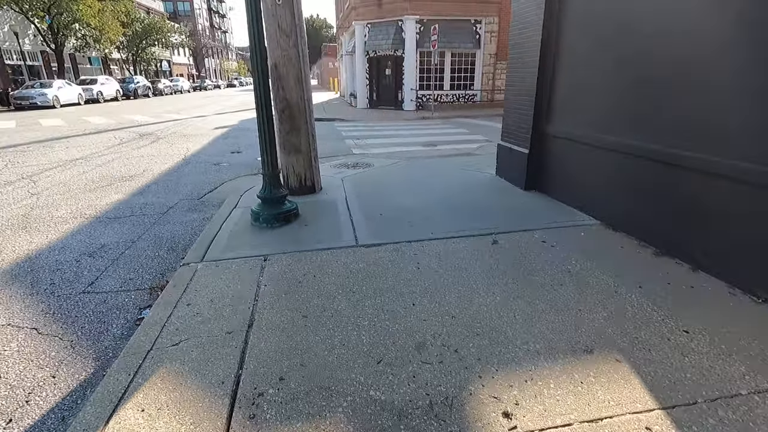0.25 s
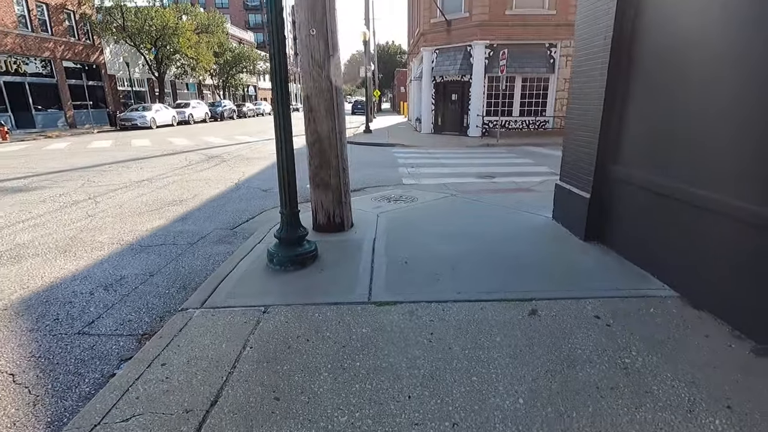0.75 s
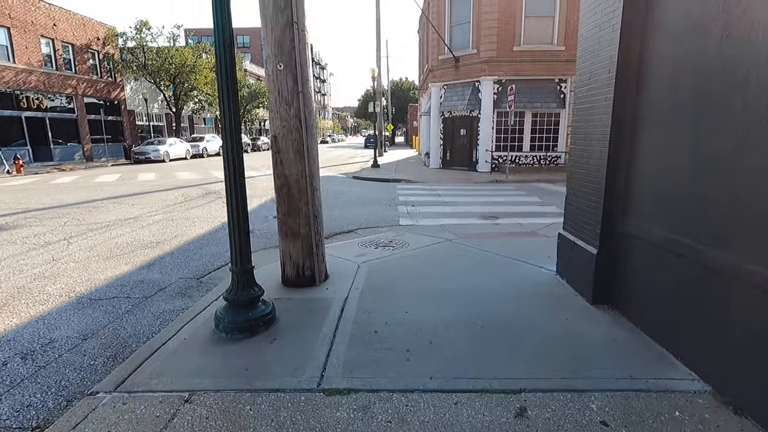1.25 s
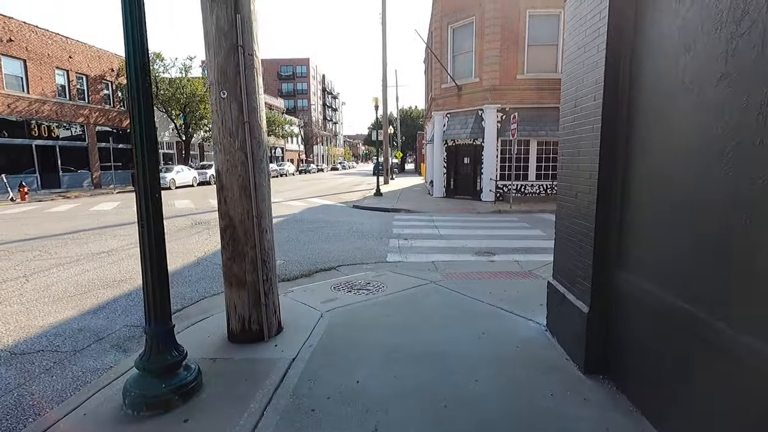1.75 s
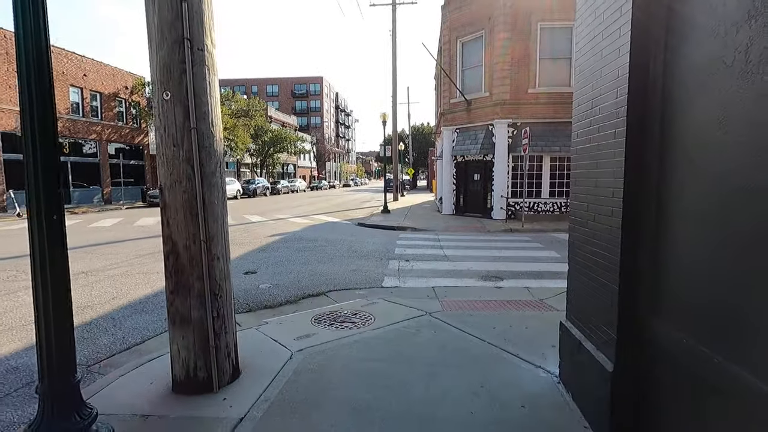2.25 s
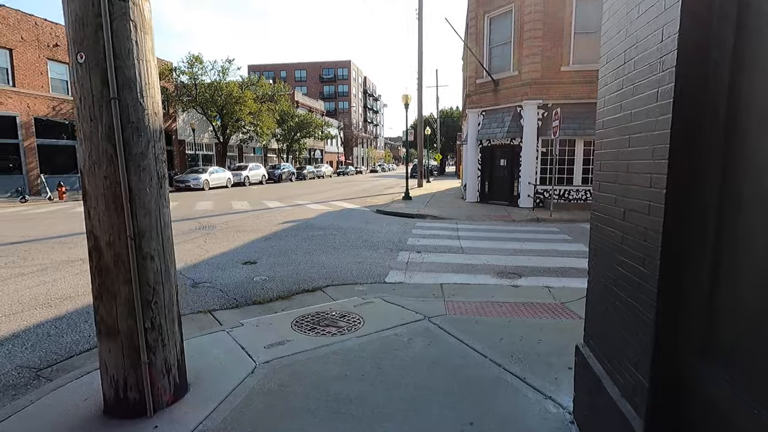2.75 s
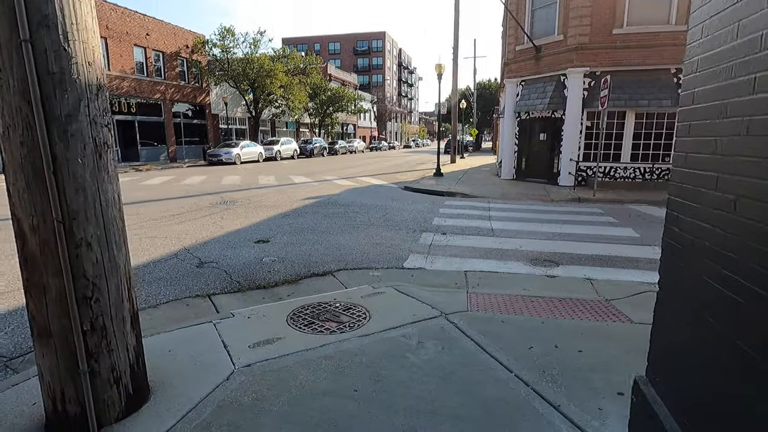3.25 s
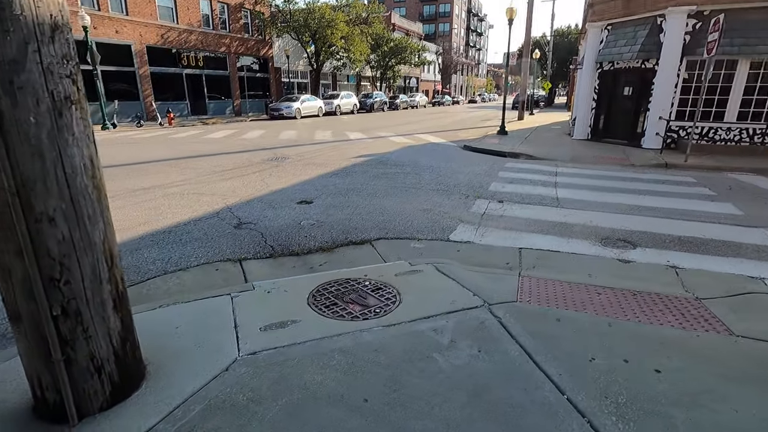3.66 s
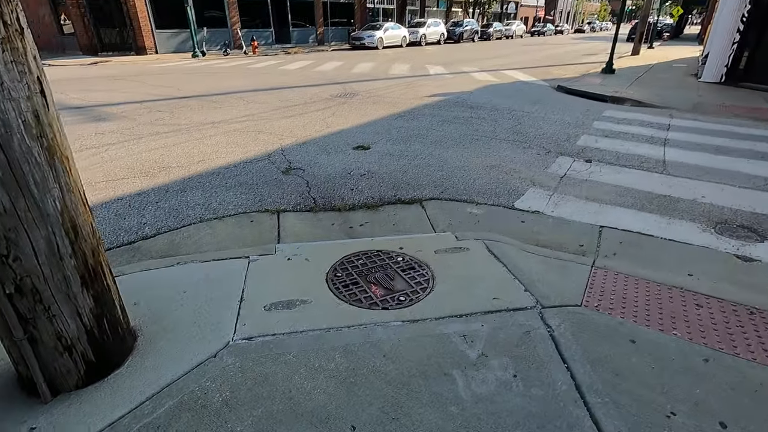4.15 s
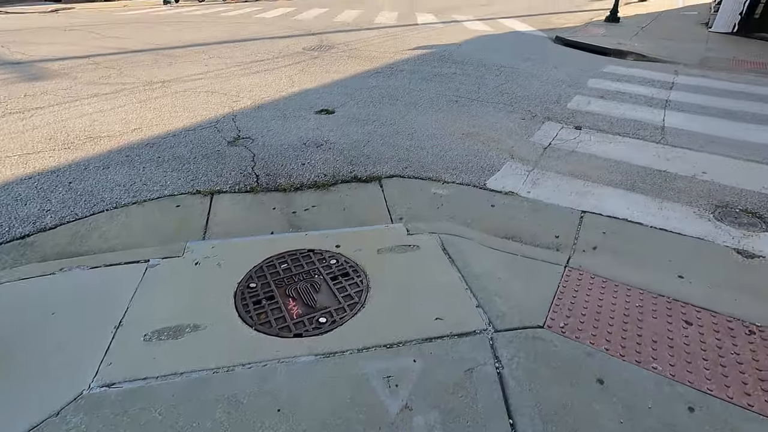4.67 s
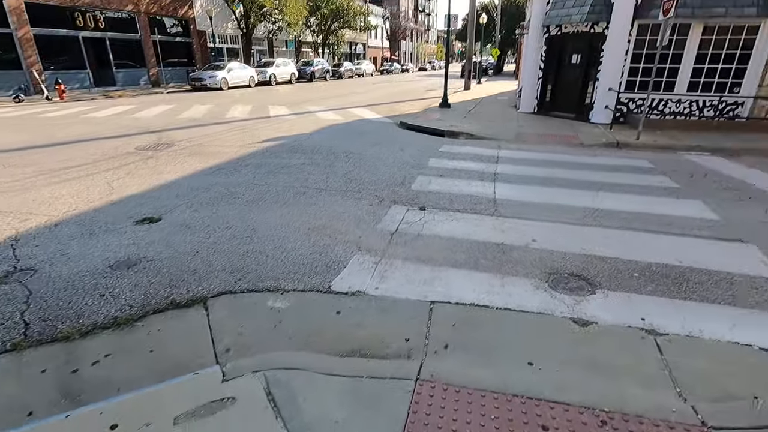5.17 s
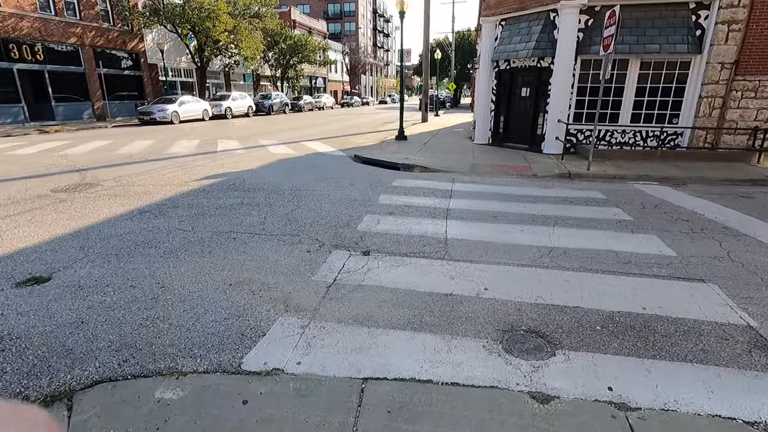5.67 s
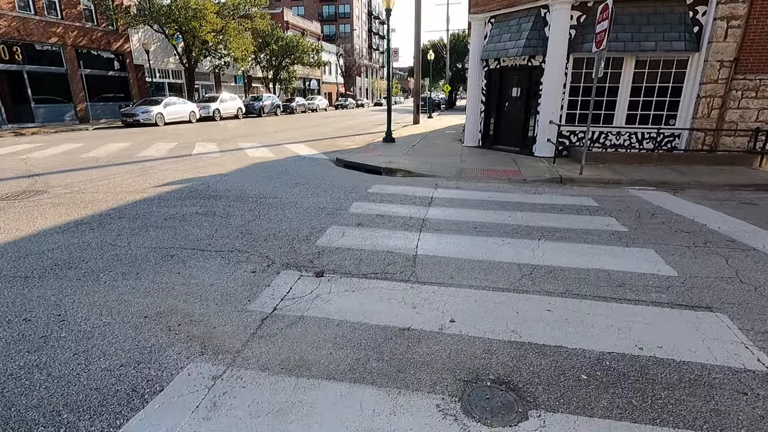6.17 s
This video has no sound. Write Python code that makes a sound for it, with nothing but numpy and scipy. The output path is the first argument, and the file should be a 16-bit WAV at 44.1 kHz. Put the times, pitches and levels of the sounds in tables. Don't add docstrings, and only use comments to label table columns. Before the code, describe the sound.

A low engine rumble slows and deepens on a small-town street while a walker's steps scuff and tick, with one sharp knock midway.

```python
import sys
import numpy as np
from scipy import signal
from scipy.fft import rfft, irfft, next_fast_len
from scipy.io import wavfile

SR = 44100
rng = np.random.default_rng(int(sys.argv[2]) if len(sys.argv) > 2 else 0)


def file_out(sig):
    cols = np.atleast_2d(sig).T
    lim = np.clip(cols, -1, 1)
    pcm = np.round(lim * 32767).astype(np.int16)
    wavfile.write(sys.argv[1], SR, pcm)


def how_loud(loudness_db):
    steps = np.asarray(loudness_db, float) / 20
    return 10 ** steps


N = 282681

# t/s, firing f/Hz, effort level/dB
ENGINE_COURSE = [(-0.0, 38.56, -27.6), (0.35, 36.64, -21.5), (1.34, 34.52, -20.6), (1.55, 33.8, -21.7),
                 (1.74, 33.41, -26.9), (2.31, 31.58, -28.8), (2.94, 30.25, -30.5), (3.29, 28.81, -21.9),
                 (3.54, 28.05, -26.0), (3.93, 31.46, -25.8), (4.21, 32.27, -31.9), (4.51, 29.68, -27.0),
                 (4.77, 26.23, -33.0), (5.04, 25.1, -28.5), (5.52, 22.75, -32.7), (5.69, 23.1, -31.4),
                 (6.07, 25.57, -28.3), (6.41, 24.41, -24.7)]
COASTING_DB = [-28, -33.5, 3.6, -24.8, -30.2, -41, -33, -35, -39, -42]
LOADED_DB = [-9, -.8, .7, -7, -17, -16, -17, -22, -23, -26]
# start t/s, end t/s
LOAD_ON_S = (1.37, 2.41)
# f/Hz, level/dB
PIPE_RESPONSE = [(20.0, -14.7), (32.0, 4.8), (56.0, 0.3), (75.0, -9.6), (100.0, 0.4), (125.0, 0.0),
                 (165.0, -0.8), (230.0, -3.7), (265.0, -2.0), (320.0, -12.0)]
# t/s, f/Hz, half length/s, level/dB
WALL_ECHOES = [(0.1, 262.0, 0.2, 18.0), (2.05, 98.0, 0.15, 2.0), (5.45, 70.0, 0.15, 4.0),
               (4.75, 190.0, 0.15, 5.0), (2.75, 195.0, 0.15, 8.0), (0.17, 189.0, 0.301, 22.8),
               (0.5, 245.0, 0.25, 12.0), (0.15, 80.0, 0.15, 12.0), (0.7, 180.0, 0.12, 10.6),
               (1.3, 310.0, 0.15, 8.0), (1.9, 262.0, 0.15, 8.0), (1.07, 69.0, 0.229, 18.2),
               (1.83, 131.0, 0.204, 5.7), (1.85, 165.0, 0.139, 15.7), (2.16, 62.0, 0.044, 11.0),
               (2.44, 159.0, 0.18, 14.2), (2.58, 93.0, 0.076, -16.8), (2.7, 124.0, 0.16, 9.5),
               (2.75, 242.0, 0.2, 6.0), (2.5, 60.0, 0.1, 5.0), (3.1, 200.0, 0.1, 5.0),
               (2.81, 29.0, 0.143, 9.0), (2.95, 92.0, 0.034, -13.5), (3.06, 91.0, 0.106, 5.5),
               (3.12, 125.0, 0.167, -19.1), (3.32, 58.0, 0.108, 1.0), (3.46, 85.0, 0.033, -11.3),
               (3.56, 174.0, 0.194, 7.7), (3.65, 118.0, 0.12, 7.4), (3.3, 265.0, 0.15, 3.0),
               (3.95, 190.0, 0.2, 6.0), (4.1, 265.0, 0.1, 5.0), (4.6, 195.0, 0.25, 5.0),
               (4.07, 97.0, 0.077, -9.3), (4.16, 159.0, 0.216, 10.2), (4.3, 99.0, 0.233, 9.3),
               (4.31, 63.0, 0.06, 6.0), (4.53, 90.0, 0.111, 2.8), (4.82, 104.0, 0.191, 16.7),
               (5.07, 176.0, 0.097, 8.4), (5.23, 105.0, 0.204, 10.9), (5.57, 111.0, 0.339, 22.7),
               (5.64, 168.0, 0.293, 21.3), (5.85, 240.0, 0.25, 6.0), (5.25, 30.0, 0.1, 5.0),
               (6.0, 176.0, 0.059, 13.1), (6.02, 110.0, 0.15, 14.3), (6.26, 136.0, 0.097, 20.1)]
# t/s, peak level/dB, ring f/Hz, t60/s, pan/dB
SOLE_KNOCKS = [
    (1.053, -30, 1280, 0.014, -1),
    (1.0855, -23, 1300, 0.007, 6),
    (1.098, -20.5, 1350, 0.0065, 4),
    (1.776, -32, 1140, 0.0037, -1),
    (3.409, -28.5, 525, 0.018, 1.0),
    (3.92, -33, 711, 0.011, -0.5),
    (4.513, -40, 554, 0.02, -3),
    (4.604, -27, 572.3, 0.01, -0.5),
    (4.951, -29, 585, 0.0041, -15),
    (5.851, -27.5, 1470, 0.01, 5),
]
# t/s, length/s, level/dB, lowest f/Hz, highest f/Hz
SOLE_SCUFFS = [(.385, .07, -45, 900, 4000), (1.032, .03, -47, 900, 5500), (1.066, 0.015, -44, 700, 4500),
               (1.084, 0.025, -42.5, 900, 5500), (2.65, .03, -38, 700, 2600),
               (2.651, .022, -44, 2000, 5500), (2.664, .012, -39, 600, 2000), (2.706, .01, -47, 2000, 4500),
               (2.716, .018, -40, 900, 2600), (3.33, 0.018, -37, 500, 1300),
               (3.331, 0.012, -41, 1200, 2000), (5.682, .031, -40.5, 900, 1800),
               (5.684, .022, -44, 1900, 2800), (5.812, .035, -47, 800, 2400),
               (1.088, .035, -49, 2800, 5600), (2.722, .014, -46, 1500, 5000),
               (4.514, 0.0065, -44, 1002, 2000)]
# t/s, peak level/dB, lowest
# f/Hz, highest f/Hz, pan/dB
TICKS = [(.392, -41.5, 1800, 7000, 2), (.416, -41.5, 2500, 7500, 3), (.439, -40, 2000, 5000, 2),
         (1.049, -37, 2400, 5500, 3), (1.0855, -33.5, 2500, 5700, 3), (1.709, -37.5, 3600, 5900, 6),
         (2.352, -36, 1700, 3600, 6), (2.652, -33.5, 1200, 6900, -1), (2.851, -37, 2000, 6488, 3),
         (3.4624, -22.5, 2900, 7200, -2), (4.0539, -32, 2210, 5850, 1.5), (4.4488, -37, 3500, 8000, 1),
         (4.453, -42, 4000, 10000, 1), (4.4565, -41, 3500, 8000, 1), (4.4703, -26.5, 2600, 8000, 2),
         (4.952, -31.5, 2500, 7000, -1), (5.223, -41, 2000, 4000, 1.5), (5.242, -37, 2500, 4500, .5),
         (5.392, -41, 2400, 4800, 1.5),
         (1.0325, -44, 6500, 8900, 7), (1.0855, -35.5, 6448, 9860, 4.5), (1.098, -42, 6500, 9000, 5),
               (1.059, -46, 6500, 9500, 5), (1.155, -48, 6500, 8500, 5), (1.2765, -40, 6500, 13500, 6),
               (1.2788, -30, 5300, 8000, 8.5), (1.2792, -43, 9500, 13990, 4), (2.409, -49, 6000, 8450, 2),
               (2.858, -58, 9000, 11600, 2), (3.4626, -37.5, 10500, 15500, -2.5),
               (4.449, -48, 9000, 15000, 1), (4.4703, -43, 8500, 15000, 2), (4.534, -39, 3500, 9500, 1.5),
               (4.684, -48, 9000, 12800, 0), (4.786, -42.5, 6770, 13500, 7), (4.812, -56, 11000, 13000, 5),
               (4.952, -39.5, 6500, 10300, 0), (5.237, -45.5, 7530, 12600, 5),
               (5.784, -37.5, 5970, 14540, 3.5)]
# t/s, body level/dB, body f/Hz, t60/s, crack level/dB, crack f/Hz
HOLDER_KNOCK = [
    (3.4625, -8.5, 225, 0.015, -11.5, 1150),
]
# t/s, peak level/dB, rise/s per 10 dB, fall/s per 10 dB
CLOTH_SLIPS = [(.43, -68, .1, .08), (1.09, -70, .12, .07), (1.71, -72, .03, .07), (2.655, -67.5, .025, .05),
               (2.73, -71, .06, .055), (3.34, -75, .05, .25), (4.07, -73, .08, .07), (4.27, -69, .06, .4),
               (4.46, -62.5, .14, .035), (4.56, -63, .03, .08), (4.69, -66.5, .09, .055),
               (5.15, -68.5, .14, .04), (5.25, -68, .05, .035), (5.7, -68.5, .12, .1),
               (5.89, -69.5, .15, .1), (6.12, -68, .035, .055), (6.28, -61.5, .09, .08)]
# f/Hz, level/dB per Hz
CLOTH_SPECTRUM = [(1500, -32.5), (3000, -3), (5000, 4.5), (8000, -2.5), (11000, -12), (13000, -16),
                  (15500, -27)]
# t/s, level/dB
TRAFFIC = [(0, -55), (.36, -55), (.8, -58.5), (1.09, -57), (1.41, -60), (1.95, -60), (2.62, -56.5),
           (3.07, -56.5), (3.5, -59), (3.86, -58.5), (4.43, -60), (5.59, -60), (5.89, -59), (6.41, -57.5)]
# f/Hz, level/dB per Hz
RUMBLE_SPECTRUM = [(14, -3.5), (25, -11.5), (45, -1.5), (80, -4), (130, -5.5), (200, -10.5), (260, -9.5),
                   (330, -18), (450, -24.5), (800, -55)]
# f/Hz, level/dB per Hz
ROAR_SPECTRUM = [(210, -31.5), (350, -2), (420, -3.5), (550, -5), (720, -7), (830, -11.5), (1100, -9.5),
                 (1600, -12), (2100, -17.5), (2450, -21), (2900, -27), (4200, -59.5)]
# f/Hz, level/dB per Hz
TREAD_SPECTRUM = [(600, -44.5), (830, -10.5), (940, 2), (1030, 1.5), (1200, -2.5), (1500, -15.5),
                  (2200, -48)]
# f/Hz, level/dB per Hz
HISS_SPECTRUM = [(1410, -29), (2400, -3), (2620, -2), (3850, -1), (5790, -7), (10400, -31.5),
                 (12100, -29.5), (12500, -30), (12900, -48)]
# t/s, level/dB
FAN_WHINE = [
    (0, -58),
    (2.1, -78.5),
    (2.5, -60),
    (4.3, -64.5),
    (4.8, -78),
    (6.41, -88),
]
# t/s, level/dB
VENT_HISS = [
    (0, -71.5),
    (3.6, -69.5),
    (4.3, -62.5),
    (5.0, -64),
    (5.4, -57),
    (6.41, -59),
]
# f/Hz, level/dB per Hz
VENT_SPECTRUM = [(2500, -39.5), (3100, -10.5), (3700, -1.5), (4800, -0.5), (5400, -2.5), (6100, 0),
                 (6700, -11), (8000, -38.5)]
# t/s, peak level/dB, rise/s per 10 dB, fall/s per 10 dB
TRILL_BOUTS = [
    (1.16, -81, 1.5, 1.5),
    (2.4, -82, .8, .6),
    (3.3, -78, .9, .2),
    (3.9, -86, .3, .8),
    (4.69, -80, .03, .03),
    (5.65, -85, .2, .6),
]
# f/Hz, level/dB per Hz
BREEZE_SPECTRUM = [(10, -14.5), (20, -0.5), (35, -3), (60, -6), (110, -30)]
# f/Hz, side minus mid level/dB
WIDTH = [(25, -20.5), (60, -24), (125, -23), (250, -17.5), (500, -7.3), (1000, -7), (2000, -5.5),
         (4000, -5.5), (8000, -4), (13000, -2.5)]
# f/Hz, left minus right level/dB
LEAN = [(25, -0.5), (125, .4), (250, 1.2), (500, .8), (1000, 2.5), (2000, 3), (4000, 0.4), (8000, 3.5),
        (13000, 8.5)]
# f/Hz, angle/rad (0 = unrelated noise, pi / 2 = a lag only)
PORT_TURN = [(200, .1), (700, .55), (2500, .5), (5000, .3), (6500, -.35), (13000, -.5)]


def engine():
    firing_hz, effort_db = in_time(ENGINE_COURSE)
    load = np.interp(seconds(), LOAD_ON_S, [0, 1])
    levels_db = []
    for k, (shut_db, open_db) in enumerate(zip(COASTING_DB, LOADED_DB), 1):
        throttle_db = shut_db + load * (open_db - shut_db)
        levels_db.append(effort_db + throttle_db + colour_db(k * firing_hz, load))
    ragged = 0.35 + 0.65 * load
    boom = orders(firing_hz, levels_db[:4], first=1, rough_db=1.8 * ragged, wander=0.25 * ragged)
    growl = orders(firing_hz, levels_db[4:], first=5, rough_db=2.5, wander=0.3)
    return (boom + growl) * sides(0.3)


def orders(firing_hz, levels_db, first, rough_db, wander):
    turn = 2 * np.pi * np.cumsum(firing_hz) / SR
    out = 0
    for k, level_db in enumerate(levels_db, first):
        phase = k * turn + rng.uniform(0, 2 * np.pi) + wander * drift(16)
        uneven = how_loud(-29.5) * (drift(3) * np.sin(phase) + drift(3) * np.cos(phase))
        tone = np.sin(phase) + uneven * [[1], [-1]]
        out = out + how_loud(level_db + rough_db * drift(18)) * tone
    return np.sqrt(2) * out


def colour_db(hz, load):
    step, echo_width_hz = 200, 16.9
    t, pitch = np.arange(0, N, step) / SR, hz[::step]
    echo_db = 0
    for s, centre_hz, half_s, db in WALL_ECHOES:
        distance = ((t - s) / half_s) ** 2 + ((pitch - centre_hz) / echo_width_hz) ** 2
        echo_db = echo_db + db * np.exp(-distance)
    return np.interp(seconds(), t, echo_db + load[::step] * at_hz(PIPE_RESPONSE, pitch))


def soles():
    out, click = np.zeros((2, N)), np.eye(1, 2000)[0]
    for s, peak_db, hz, t60_s, pan_db in SOLE_KNOCKS:
        knock = ring(ring(click, hz, t60_s), 1.25 * hz, 0.49 * t60_s)
        add(out, s, how_loud(peak_db) * knock / abs(knock).max() * sides(pan_db))
    for s, length_s, level_db, low_hz, high_hz in SOLE_SCUFFS:
        grains_db = 4 * np.repeat(rng.standard_normal(100), 60)
        grit = rng.standard_normal(6000) * how_loud(grains_db)
        grit = signal.lfilter([1], [1, -0.93], grit)
        grit = rms_one(band(grit, low_hz, high_hz))
        progress = np.clip(np.arange(6000) / (length_s * SR), 0, 1)
        stroke = np.sin(np.pi * progress ** 0.4) ** 0.5
        scuff = grit * stroke
        scuff = scuff / np.sqrt(np.sum(scuff ** 2) / np.sum(stroke ** 2))
        add(out, s, how_loud(level_db) * scuff * sides(1.8))
    return out


def holder():
    out, click = np.zeros((2, N)), np.eye(1, 2000)[0]
    for s, body_db, body_hz, t60_s, crack_db, crack_hz in HOLDER_KNOCK:
        crack = how_loud(crack_db) * ring(click, crack_hz, 0.0022)
        body = how_loud(body_db) * ring(np.roll(click, round(0.0004 * SR)), body_hz, t60_s)
        add(out, s, (body - crack) * sides(-7.7))
    return out


def ticks():
    out, t = np.zeros((2, N)), np.arange(1500) / SR
    for s, peak_db, low_hz, high_hz, pan_db in TICKS:
        tail = 0.09 * rng.standard_normal(len(t)) * np.exp(-t / 0.0006)
        tick = band((t == 0) + tail, low_hz, high_hz)
        add(out, s, how_loud(peak_db) * tick / abs(tick).max() * sides(pan_db))
    return out


def cloth():
    swish = how_loud(-70.5 - 5.5 * seconds())
    grain = 2.6 * how_loud(0.76 * drift(90))
    return (bouts(CLOTH_SLIPS) + swish) * grain * diffuse(CLOTH_SPECTRUM, patchy_db=-0.3, wide_db=-2.3)


def street():
    traffic_db, = in_time(TRAFFIC)
    swing_db, t = traffic_db + 58, seconds()
    rumble_db = -32.5 + 0.8 * swing_db - 0.3 * t
    roar_db = -41.5 + 0.5 * swing_db - 0.9 * t
    tread_db = -42.6 + 0.4 * swing_db - 2.5 * t
    rumble = how_loud(rumble_db) * diffuse(RUMBLE_SPECTRUM, patchy_db=1.0, wide_db=-1.5)
    roar = how_loud(roar_db) * diffuse(ROAR_SPECTRUM, patchy_db=1.44, wide_db=0.2)
    tread = how_loud(tread_db) * diffuse(TREAD_SPECTRUM, patchy_db=0.5, wide_db=-0.6)
    hiss = how_loud(traffic_db + 1.5) * diffuse(HISS_SPECTRUM, patchy_db=1.5, wide_db=1.7)
    return rumble + roar + tread + hiss


def fan():
    whine_db, = in_time(FAN_WHINE)
    vent_db, = in_time(VENT_HISS)
    whine = rms_one(ring(rng.standard_normal(N), 2250, 0.038))
    vent = diffuse(VENT_SPECTRUM, patchy_db=0.5, wide_db=-3.5)
    return how_loud(whine_db) * whine * sides(2.1) + how_loud(vent_db) * vent


def insect():
    noise = 0.7 * rng.standard_normal(N) + 0.6 * rng.standard_normal((2, N))
    lower = ring(ring(noise, 11700, 0.003), 11800, 0.003)
    upper = ring(ring(noise, 12050, 0.003), 12200, 0.003)
    throb = how_loud(-1.0 + 3.3 * drift(25) + 1.0 * drift(5))
    return bouts(TRILL_BOUTS) * throb * rms_one(lower + upper) * sides(4.0)


def breeze():
    return how_loud(-40) * diffuse(BREEZE_SPECTRUM, patchy_db=4.5, wide_db=10.5)


def diffuse(spectrum, patchy_db, wide_db):
    size = next_fast_len(N)
    hz = np.maximum(np.fft.rfftfreq(size, 1 / SR), 1)
    mid, side = rfft(rng.standard_normal((2, size))) * how_loud(at_hz(spectrum, hz))
    turn = at_hz(PORT_TURN, hz)
    side = side * np.cos(turn) - 1j * mid * np.sin(turn)
    side = side * how_loud(at_hz(WIDTH, hz) + wide_db)
    pair = np.array([mid + side, mid - side]) * sides(at_hz(LEAN, hz))
    low, high = np.log2(spectrum[0][0]), np.log2(spectrum[-1][0])
    out, together = 0, drift(6.4)
    for octave in np.arange(low, high + 1):
        part = pair * np.maximum(1 - abs(np.log2(hz) - octave), 0)
        flicker_db = patchy_db * (0.6 * together + drift(14))
        out = out + irfft(part, size)[:, :N] * how_loud(flicker_db)
    return rms_one(out)


def bouts(rows):
    t = np.arange(0, N + 40, 40) / SR
    slopes_db = [peak_db - 10 * np.maximum((s - t) / rise_s, (t - s) / fall_s)
                 for s, peak_db, rise_s, fall_s in rows]
    return np.interp(seconds(), t, how_loud(np.max(slopes_db, axis=0)))


def drift(rate_hz):
    r = np.exp(-80 * np.pi * rate_hz / SR)
    slow = signal.lfilter([1], [1, -2 * r, r * r], rng.standard_normal(N // 40 + 2002))[2000:]
    return np.interp(np.arange(N) / 40, np.arange(len(slow)), rms_one(slow))


def ring(x, hz, t60_s):
    r, w = how_loud(-60 / (t60_s * SR)), 2 * np.pi * hz / SR
    return signal.lfilter([0, np.sin(w)], [1, -2 * r * np.cos(w), r * r], x)


def band(x, low_hz, high_hz):
    return signal.sosfilt(signal.butter(3, [low_hz, high_hz], "band", fs=SR, output="sos"), x)


def rms_one(x):
    return x / np.sqrt(np.mean(x ** 2) + 1e-20)


def seconds():
    return np.arange(N) / SR


def in_time(rows):
    s, *columns = np.transpose(rows)
    return [np.interp(seconds(), s, c) for c in columns]


def at_hz(points, hz):
    table_hz, values = np.transpose(points)
    return np.interp(np.log(hz), np.log(table_hz), values)


def sides(pan_db):
    return how_loud(np.array([[0.5], [-0.5]]) * pan_db)


def add(out, s, sound):
    i = round(s * SR)
    out[:, i:i + sound.shape[1]] += sound[:, :N - i]


def scene():
    steps = soles() + holder() + ticks() + cloth()
    background = street() + fan() + insect() + breeze()
    return engine() + steps + background


def low_pass(x):
    return signal.sosfilt(signal.butter(12, 15300, fs=SR, output="sos"), x)


def record(dry):
    rolled = signal.sosfilt(signal.butter(3, 12700, fs=SR, output="sos"), dry)
    fade = np.minimum(np.arange(N)[::-1] / 60, 1)
    return low_pass(rolled * fade)


dry = scene()
out = record(dry)
file_out(out)
```